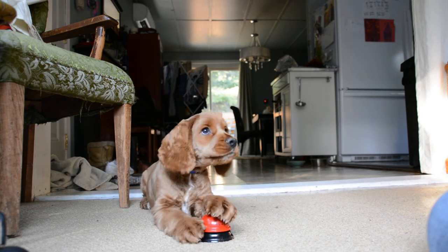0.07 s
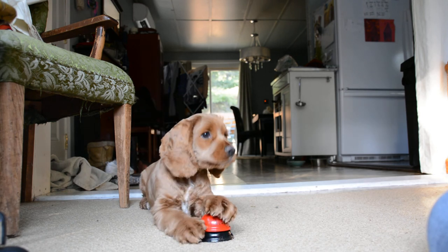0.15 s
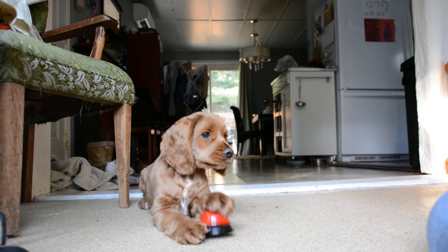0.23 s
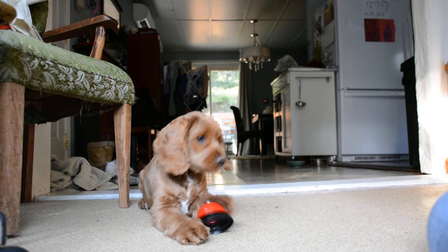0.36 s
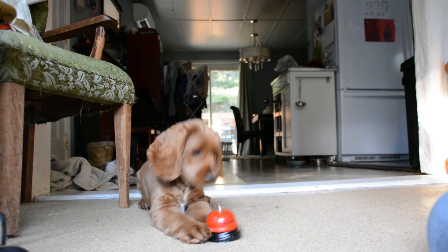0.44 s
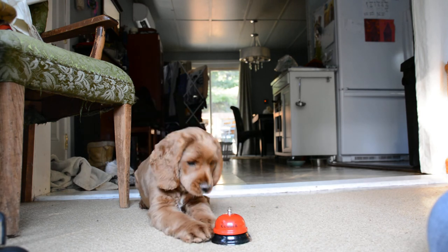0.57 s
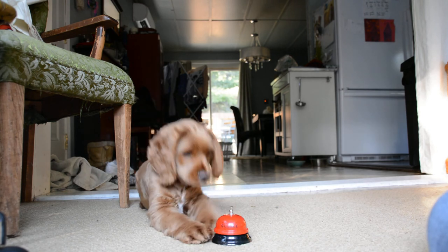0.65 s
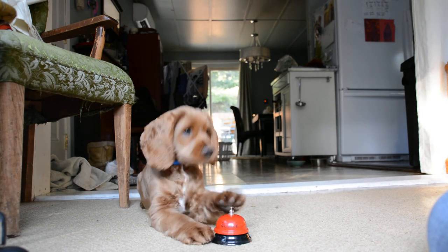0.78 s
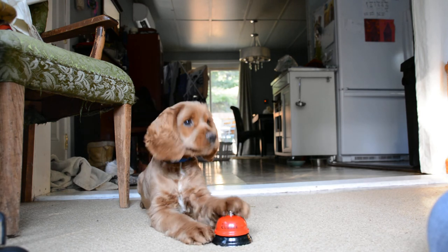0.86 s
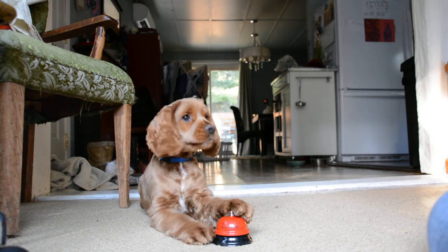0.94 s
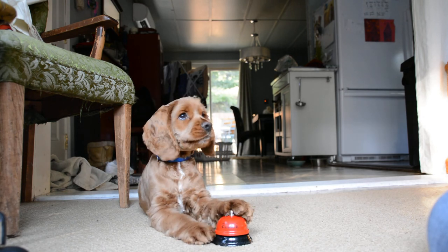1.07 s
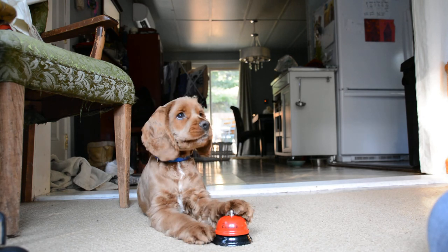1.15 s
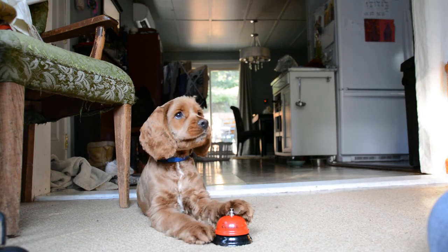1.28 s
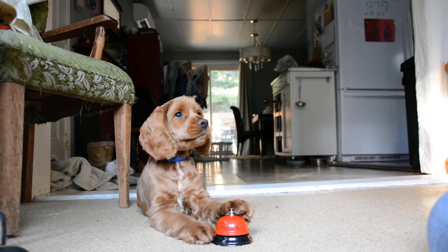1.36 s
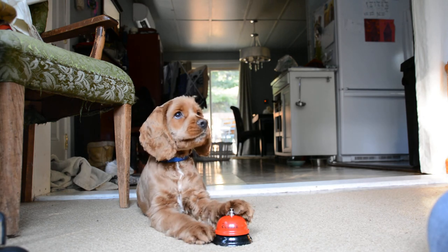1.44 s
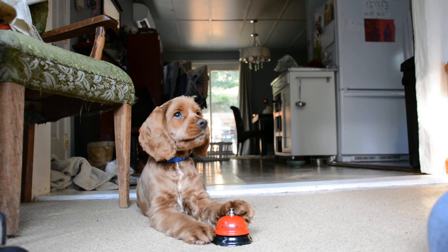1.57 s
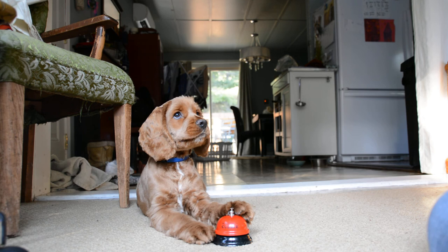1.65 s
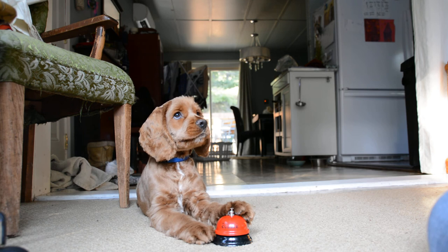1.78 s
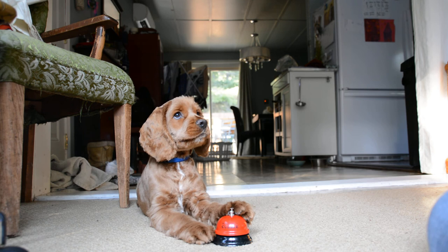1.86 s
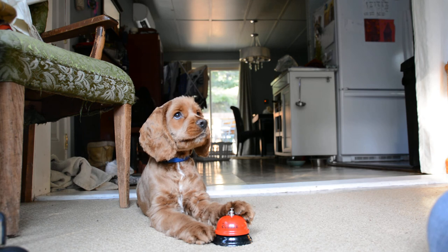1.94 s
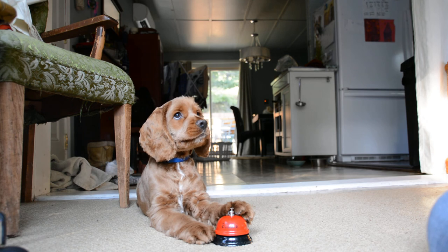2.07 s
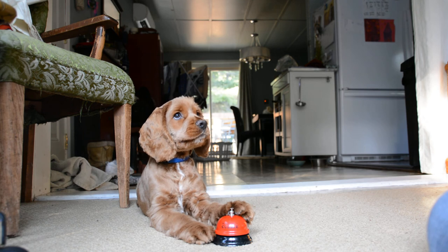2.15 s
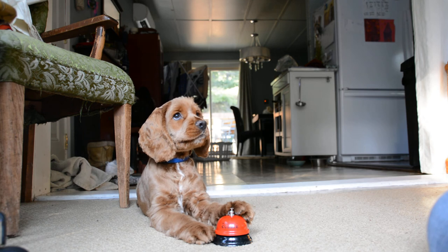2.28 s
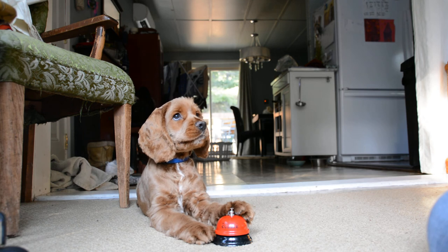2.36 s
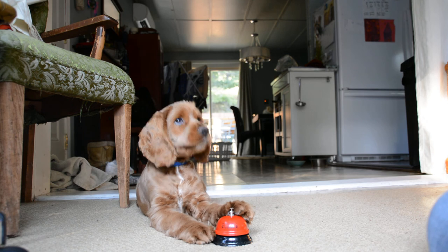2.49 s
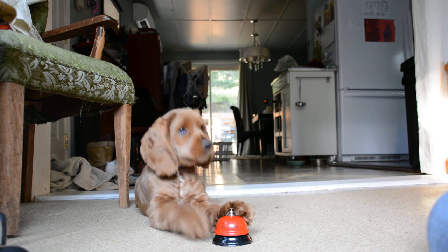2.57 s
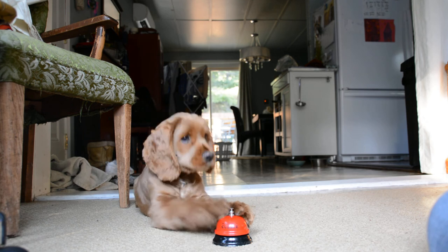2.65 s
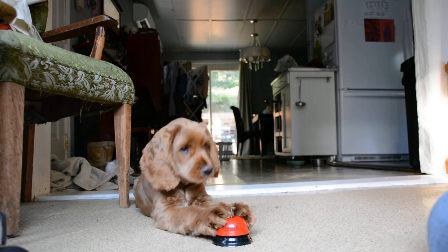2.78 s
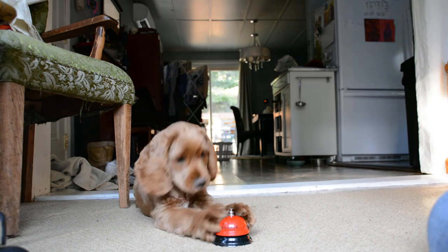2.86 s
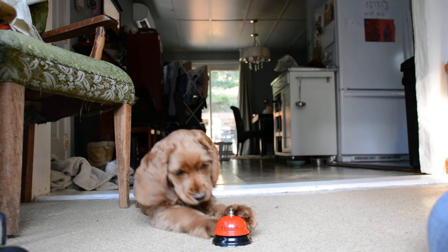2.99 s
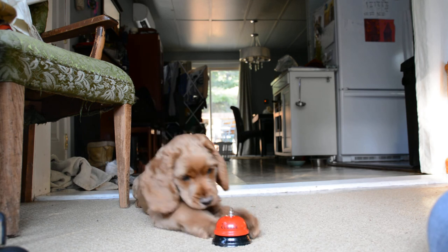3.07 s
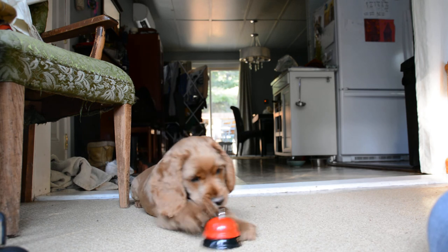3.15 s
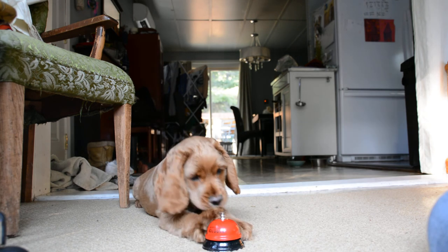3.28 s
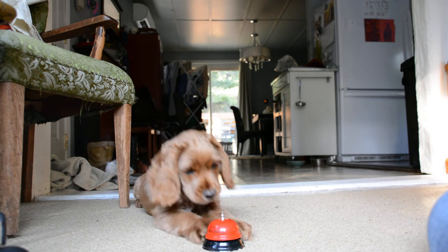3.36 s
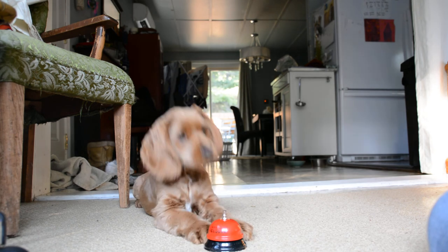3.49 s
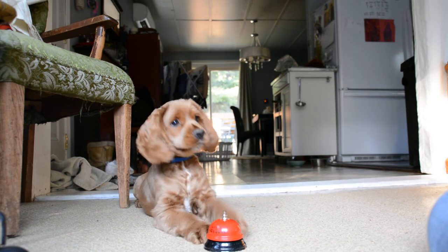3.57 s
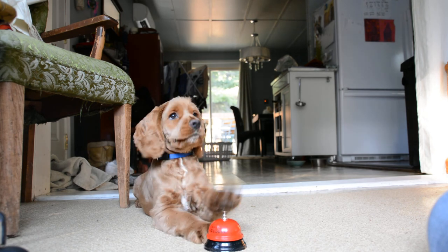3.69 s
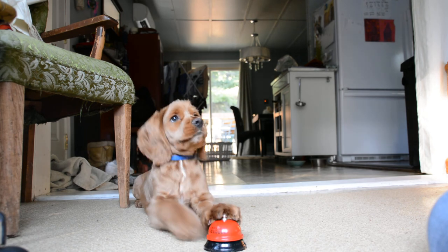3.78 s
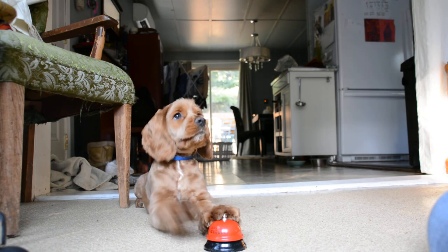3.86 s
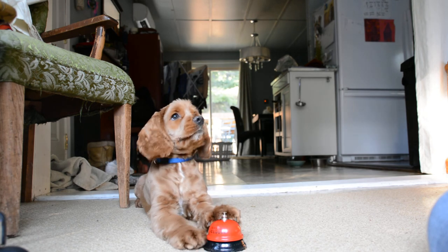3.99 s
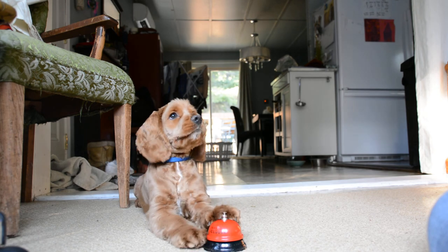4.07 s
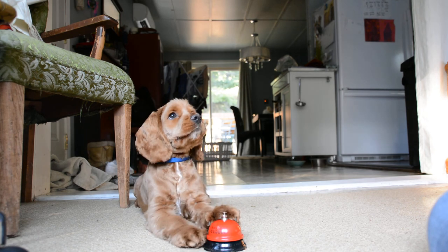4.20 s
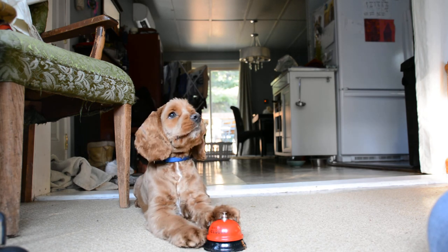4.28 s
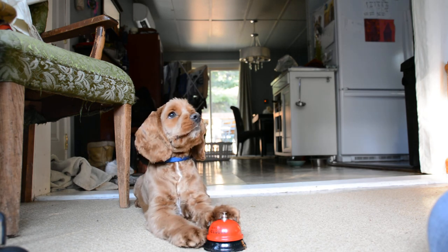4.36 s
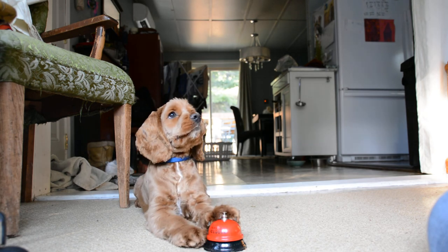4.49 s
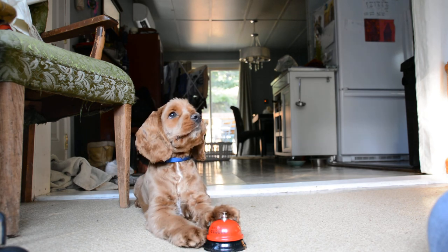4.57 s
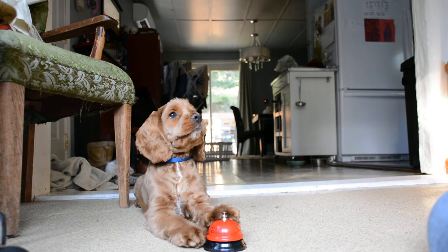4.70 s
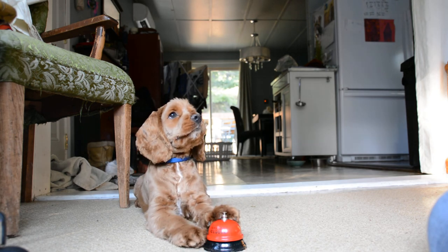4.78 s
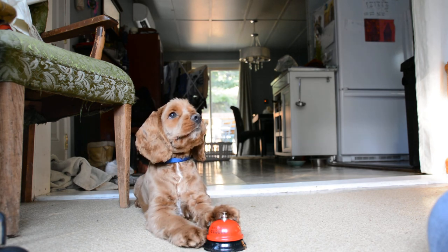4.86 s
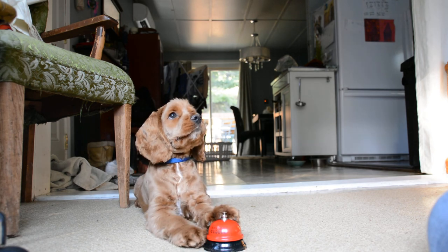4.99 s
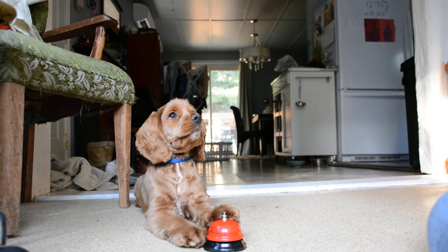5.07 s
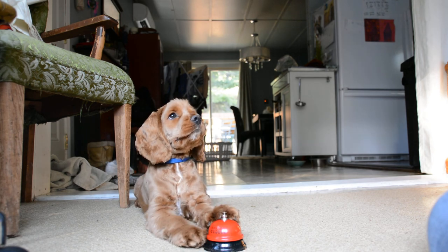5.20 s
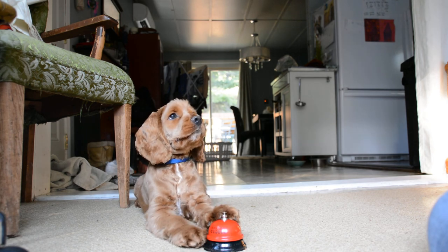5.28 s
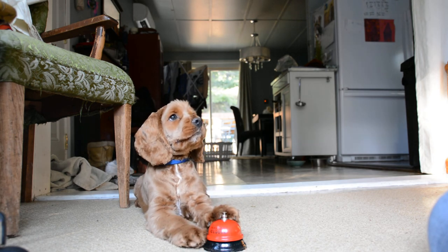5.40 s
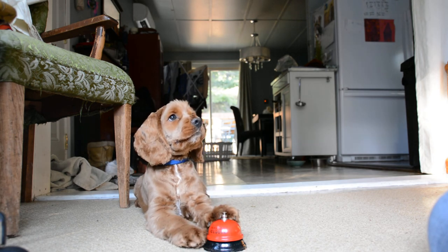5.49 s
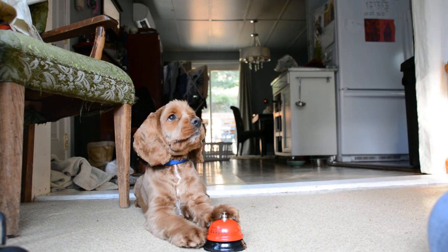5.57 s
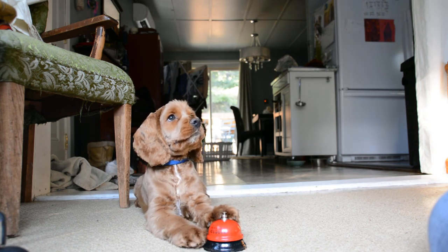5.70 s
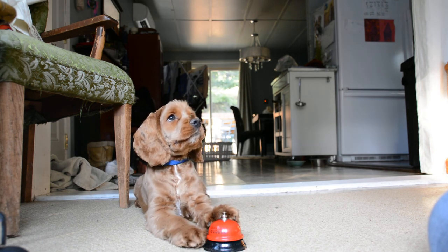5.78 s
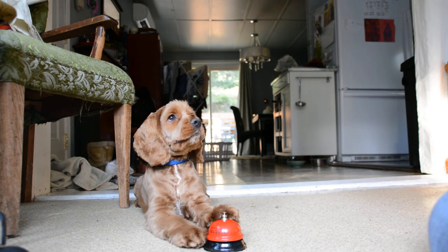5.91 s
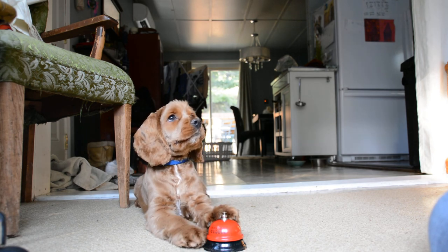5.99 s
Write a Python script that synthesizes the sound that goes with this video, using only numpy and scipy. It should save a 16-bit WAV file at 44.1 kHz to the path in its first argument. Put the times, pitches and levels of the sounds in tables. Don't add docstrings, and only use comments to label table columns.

```python
import sys
import numpy as np
from scipy import signal
from scipy.fft import rfft, irfft, next_fast_len
from scipy.io import wavfile
from scipy.ndimage import uniform_filter1d, map_coordinates

SR = 44100
rng = np.random.default_rng(int(sys.argv[2]) if len(sys.argv) > 2 else 0)


def waveform_to_disk(signal):
    frames = np.transpose(np.atleast_2d(signal))
    scaled = np.clip(frames, -1, 1) * 32767
    samples = np.round(scaled).astype(np.int16)
    wavfile.write(sys.argv[1], SR, samples)


def gain_from_decibels(decibels):
    exponent = np.asarray(decibels, float) / 20
    return 10 ** exponent


N = 266343
SPAN = 8192
HZ = np.fft.rfftfreq(SPAN, 1 / SR)
# t/s, peak/dB, low pairs/dB rel, bell turned to the left -1..1, paw still touching 0..1
DINGS = [
    (0.8488, -8, -6, 0.3, 0),
    (3.3893, -31, -3, 0.12, 0.88),
    (3.7487, -10.5, -1, 0.089, 0),
]


def dome(track):
    low_pairs = np.array([0, 1, 1, 1, 0])
    rim_pair = np.array([0, 1, 0, 0, 0])
    flank_pairs = np.array([0, 0, 1, 1, 0])
    ding_db = [-1, -17, -14, -6.5, -11.5]
    turn_db = [-0.5, -0.5, 1.5, -2.5, 0.5]
    touch_db = [1.5, 0.5, 2.5, -11.5, 2.5]
    lands = [
        [1.3, -.8, -.4, -.95, .33],
        [.7, .9, 1.2, 1.4, .5],
        [1.0, .7, 1.25, .38, -.5],
    ]
    # level/dB always, and per turn
    lean_db = [-.3, 0, 2.09, .2, .9]
    turn_lean_db = [7, 0, -0.8, -2.5, -3.5]
    # rate/(dB/s) always, and per turn
    skew_rate = [6.5, 8, -3.5, 6, 5.5]
    turn_skew = [-6, -8, 5, 3, -3]
    # rate/(dB/s) under a touching paw, per turn, and under a lingering claw
    touch_choke = [150, -2.5, -20, -25, 139.5]
    turn_choke = [-5, 5, -35, -75, 10.5]
    claw_choke = [258.5, -0.5, 58.5, 0.5, 100]
    for (s, db, low_db, turn, touch), angles in zip(DINGS, lands):
        levels = db + low_db * low_pairs + ding_db
        levels = levels + turn * np.array(turn_db) + touch * np.array(touch_db)
        leans = lean_db + turn * np.array(turn_lean_db)
        skews = skew_rate + turn * np.array(turn_skew)
        chokes = touch * np.array(touch_choke) + turn * np.array(turn_choke)
        ring(track, s, levels, angles, leans, skews, chokes)

    # t/s, peak/dB, rim pair/dB rel, flank pairs/dB rel
    taps = [(0.261, -43.5, -14.5, -6), (0.332, -45.5, -17, 2), (.3777, -43, -35, -18),
            (.4288, -34, -7.5, -6.5), (.4594, -37, -44, -5), (.5521, -36, -34, -18),
            (1.2052, -46, -18, -16), (2.9647, -53, -6, 0), (2.977, -44.5, 1, -27), (3.0144, -43, -28, -18),
            (3.0842, -49, -7, -17), (3.137, -33, -7, -17), (3.2048, -24.5, -25, -2.5),
            (3.895, -37, -30, -18)]
    tap_db = [1, 2, -5.5, 2, -13.5]
    chance = rng.uniform(-1, 1, (len(taps), 3, 5)) * [[1.5], [2.5], [30]]
    for (s, db, rim_db, flank_db), (angles, leans, skews) in zip(taps, chance):
        levels = db + rim_db * rim_pair + flank_db * flank_pairs + tap_db
        ring(track, s, levels, angles, leans, skews, claw_choke)


def ring(track, s, levels, angles, leans, skews, chokes):
    # lower f/Hz, upper f/Hz
    modes = [(9424, 9465), (1072, 1087), (3050, 3085), (5943, 5981), (12872, 12895)]
    # free t60/s, share of the paw's damping, phase by which left leads/rad
    losses = [(0.675, 0.89, .7), (5, 0.8, -0.2), (2.4, 1.32, .3), (0.69, 0.93, .37), (0.29, .75, -.99)]
    # t/s, damping from then on/(dB/s)
    grip = [(0, 51), (.38, 329.5), (.5, 200), (.83, 163), (1.19, 329), (3.2, 430.5), (3.38, 22),
            (3.757, 197.5), (3.785, 499), (3.835, 150), (3.905, 448.5)]
    settle_s = 0.029
    t = np.arange(SR // 2) / SR
    side = np.array([[.5], [-.5]])
    when, rate = np.transpose(grip)
    held = rate[np.clip(np.searchsorted(when, s + t) - 1, 0, None)]
    paw_db = np.cumsum(uniform_filter1d(held, size=round(settle_s * SR))) / SR
    sound = np.zeros((2, len(t)))
    rows = zip(modes, losses, levels, angles, leans, skews, chokes)
    for (low, high), (t60, share, lead), db, angle, lean, skew, choke in rows:
        lower = np.cos(angle) * gain_from_decibels(skew * t) * np.sin(2 * np.pi * low * t + lead * side)
        upper = np.sin(angle) * gain_from_decibels(-skew * t) * np.sin(2 * np.pi * high * t + lead * side)
        decay_db = (60 / t60 + choke) * t + share * paw_db
        sound += gain_from_decibels(db + 1.0 - decay_db + lean * side) * (lower + upper)
    onset = 1 - np.exp(-t / 4e-5)
    fade = np.cos(np.pi * t) ** .5
    add(track, s, sound * fade * onset, wet_db=-12)


def knocks(track):
    # t/s, peak/dB, weight/dB rel, edge/dB rel
    claw_knocks = [(0.2167, -37.5, -1.5, -23), (0.2643, -29, -10, -12), (0.299, -57, 12, -3),
                   (0.3326, -28, 2.5, -4), (0.356, -30, -15, -8), (0.382, -26, -16, -27),
                   (.3938, -25.5, -16, -4), (0.4259, -13.5, -4, -20), (0.5206, -26.5, -2, -7),
                   (0.5493, -24, -4, -27), (0.6096, -34, -23, -12), (1.0738, -40.5, 5.5, -27),
                   (1.108, -52, 16.5, -13.5), (2.544, -45, 10, -21.5), (2.6613, -37, -8, -12),
                   (2.8298, -47.5, -5, -5), (2.849, -43, -5, -8), (2.8825, -41, -14, -9.5),
                   (2.9638, -36, -15, -7), (2.9801, -22.5, -3.5, -11.5), (3.0979, -27.5, 3, -11),
                   (3.1339, -27.5, 3, -6), (3.1637, -20.5, -0.5, -20), (3.18, -19.5, 0.5, -21),
                   (3.2006, -24, -31, -31), (3.2066, -21.5, -28, 1), (3.2514, -31, -10, -3),
                   (3.2755, -24, 2.5, -4.5), (3.3654, -18, -33, -20), (3.4077, -34, -13, -15)]
    # t/s, peak/dB, contact t60/s
    plunger = [
        (0.8068, -27.5, 0.038),
        (0.8318, -21.5, 0.013),
        (1.1788, -37.5, .059),
        (1.198, -22.5, 0.048),
        (3.7195, -28.5, .05),
        (3.7364, -38.5, .036),
        (3.8969, -26.5, .058),
    ]
    # [(t/s, level/dB)]
    parts = [(620, 33, 0.02, [(1.2, -44.5), (3.897, -38.5)]), (2780, 40, 0.042, [(.426, -33.5),
             (.553, -31.5), (3.165, -28)]), (2895, 41, .06, [(.56, -40.5), (3.18, -32), (3.21, -29)]),
             (3632, 12, 0.0086, [(1.2, -43.5), (3.897, -40.5)]), (4047, 31.4, 0.077, [(.386, -42),
             (3.193, -28.5), (3.245, -27.5), (3.366, -39)]), (4190, 63, .04, [(.81, -50.5), (2.665, -54),
             (3.099, -43)]), (4520, 70, 0.03, [(.851, -33), (1.2, -47), (3.897, -47.5)]),
             (5330, 67, 0.0203, [(1.2, -48.5), (3.897, -51)]), (7740, 25, .08, [(.473, -44), (.555, -36)]),
             (9670, 240, 0.017, [(.261, -41.5), (.332, -34.5), (3.207, -29)]),
             (10720, 45, .05, [(.427, -47.5), (.553, -36), (2.991, -41.5)]), (14900, 60, .13, [(.521, -51),
             (3.178, -41), (3.416, -58), (3.897, -62.5)])]
    contacts = [(*row, .03) for row in claw_knocks]
    contacts += [(s, db, -5.5, -16, t60) for s, db, t60 in plunger]
    for s, db, low_db, turn, touch in DINGS:
        clack_db = db + low_db + 2.5 - 12 * touch
        contacts.append((s, clack_db, -10.5, -3, .011))
    for s, db, body_db, edge_db, t60 in contacts:
        steel = colour(contact(body_db, edge_db), ring_db=7, scatter_db=3)
        add(track, s, gain_from_decibels(db + 15) * irfft(rattle(t60) * steel), wet_db=-1.0)
    for hz, width, t60, songs in parts:
        part = resonances([(hz, width, 0)], HZ)
        for s, db in songs:
            song = rattle(t60) * part
            level = gain_from_decibels(db) * SR / width / np.pi * np.linalg.norm(part) / np.linalg.norm(song)
            add(track, s, level * irfft(song), wet_db=-6)


def scrape(track):
    # peak t/s, peak/dB, rise/s, fall/s, weight/dB rel
    strokes = [
        (.4, -50.5, 0.66, .02, -10),
        (0.427, -27, 0.021, 0.12, -7),
        (.554, -27, 0.0081, .12, -6),
        (1.075, -61, .02, 0.15, 8),
        (2.89, -62, 0.11, 0.12, 3),
        (2.987, -31.5, 0.0075, 0.099, -12),
        (3.21, -23.5, 0.16, .17, -12.5),
        (3.373, -32.5, 0.016, 0.18, -2),
        (3.899, -34.5, 0.0032, .1, -12),
    ]
    stroke_db = 34
    step = 768
    slips = rng.standard_normal(N) * gain_from_decibels(13 * np.clip(rng.standard_normal(N), -3, 2.7))
    bunching = unit(uniform_filter1d(rng.standard_normal(N), size=round(.004 * SR)))
    slips = slips * gain_from_decibels(3.5 * bunching)
    window = np.sqrt(np.hanning(2 * step))
    for s, peak_db, rise, fall, body_db in strokes:
        start = s - min(rise, .19)
        tilt = contact(body_db, edge_db=-10)
        drag = np.zeros(round((s + fall - start) * SR) + SPAN + 2 * step)
        for i in range(0, len(drag) - SPAN - step, step):
            t = start + (i - step + np.arange(2 * step)) / SR - s
            db = peak_db - stroke_db * np.where(t < 0, -t / rise, t / fall)
            grains = unit(slips[round(start * SR) + i:][:2 * step])
            slip = rfft(gain_from_decibels(db - 1.5) * grains * window, SPAN)
            drag[i:i + SPAN] += irfft(slip * colour(tilt, ring_db=9.5, scatter_db=3))
        add(track, start - step / SR, drag, wet_db=-6.0)


def colour(tilt, ring_db, scatter_db):
    # f/Hz, width/Hz, level/dB
    base = [(1520, 580, -18), (2603, 110, 5), (2775, 69, 1.5), (2960, 130, 4), (3384, 36, -5),
            (3740, 15, 2.5), (4120, 25, -1), (4754, 64, -1.5), (5660, 21, -10), (6590, 130, -0.5),
            (7300, 26, -9.5), (8500, 84, -20.5), (8700, 68, -14.5), (9440, 150, 4), (9900, 29, -12),
            (10700, 81, -2), (12900, 44, -18.5), (14650, 284, -28)]
    peaks = [(c, w, 0.49 * db) for c, w, db in base]
    scatter = scatter_db * rng.standard_normal(len(base))
    return tilt * (1 + gain_from_decibels(ring_db) * resonances(peaks, HZ, scatter))


def contact(body_db, edge_db):
    # f/Hz, level/dB
    middle = [(400, -66.5), (1200, -9.5), (2000, -5.5), (4500, 0), (5200, -12.5), (7000, -37.5),
              (12000, -46)]
    # f/Hz, level/dB
    body = [(60, -60), (200, -20), (500, -1.5), (1000, 5.5), (1800, -2), (2800, -30.5), (6000, -62)]
    # f/Hz, level/dB
    edge = [(2000, -65), (4500, -21.5), (6000, 6), (9000, 2.5), (11000, 4.5), (13000, -11), (15300, -22.5),
            (16300, -72.5)]
    weight = gain_from_decibels(body_db + along(body, HZ))
    sharpness = gain_from_decibels(edge_db + along(edge, HZ))
    return causal(gain_from_decibels(along(middle, HZ)) + weight + sharpness)


def rattle(t60):
    t = np.arange(SPAN) / SR
    level_db = 7.9 * rng.standard_normal(SPAN) - 60 * t / max(t60, .002)
    burst = rng.standard_normal(SPAN) * gain_from_decibels(level_db)
    return rfft(burst / np.linalg.norm(burst))


def thumps(track):
    # t/s, floor/dB, hollow/dB
    drops = [(0.262, -60, -53), (0.371, -59, -58), (0.421, -52, -52), (0.547, -41.5, -39.5),
             (0.81, -43, -61), (.842, -52, -43.5), (2.669, -52, -60.5), (2.849, -63, -56),
             (2.976, -46, -43.5), (3.099, -42.5, -52), (3.138, -48, -47.5), (3.2, -47, -46.5),
             (3.269, -66, -56), (3.361, -45.5, -45.5), (3.408, -54, -46), (3.736, -51, -46),
             (3.897, -32, -40)]
    # f/Hz, width/Hz, level/dB
    floorboard = [(85, 37, 5), (126.4, 32, 1)]
    # f/Hz, width/Hz, level/dB
    cavity = [(158, 74, -2.5), (309, 37, 3), (494, 100, -3.5), (742.7, 150, -2)]
    push_s = 0.0013
    t = np.arange(SPAN) / SR
    force = t * np.exp(-t / push_s)
    push = rfft(force / force.sum())
    muffling = (1 + 1j * HZ / 900) ** 2
    for s, db, hollow_db in drops:
        floor = gain_from_decibels(db + 49.5) * push * resonances(floorboard, HZ)
        hollow = gain_from_decibels(hollow_db + 48) * rattle(0.03) * resonances(cavity, HZ) / muffling
        add(track, s, irfft(floor + hollow), wet_db=-5)


def resonances(peaks, f, scatter_db=0):
    total = 0
    offsets = scatter_db + np.zeros(len(peaks))
    for k, ((c, w, db), d) in enumerate(zip(peaks, offsets)):
        total = total + (-1) ** k * gain_from_decibels(db + d) * 1j * f * w / (c * c - f * f + 1j * f * w)
    return total


def causal(gain):
    cepstrum = irfft(np.log(gain + 1e-6))
    cepstrum[1:SPAN // 2] *= 2
    cepstrum[SPAN // 2 + 1:] = 0
    return np.exp(rfft(cepstrum))


def add(track, s, x, wet_db):
    # f/Hz, t60/s
    decay = [(100, 0.45), (1000, 0.21), (4000, 0.22), (10000, 0.24), (15000, 0.1058)]
    # f/Hz, likeness
    tail_alike = [(100, 1), (1000, 1), (5000, 1), (15000, 0.42)]
    hz, t, z = signal.stft(rng.standard_normal((2, 10240)), SR, nperseg=256)
    hz = hz[:, None]
    z = pair(z, tail_alike, hz) * gain_from_decibels(-60 * t / along(decay, hz))
    tail = signal.istft(z, SR, nperseg=256)[1]
    tail = np.pad(tail / np.linalg.norm(tail[0]), ((0, 0), (130, 0)))
    tail[:, 0] = gain_from_decibels(-wet_db)
    y = gain_from_decibels(wet_db) * signal.fftconvolve(x * np.ones((2, 1)), tail, axes=1)
    track[:, round(s * SR):][:, :y.shape[1]] += y


def quiet():
    # f/Hz, density/dB per Hz
    air_db = [(15, -49), (25, -20.5), (64, -21), (87, -12), (229, -8), (270, -9.5), (301, -8), (427, -9),
              (591, -4.5), (641, -7), (695, -4.5), (754, -5.5), (2350, -11.5), (10400, -28), (16000, -39)]
    # f/Hz, likeness
    air_alike = [(60, 1), (130, 0.96), (290, 0.45), (640, 0.42), (1410, 0.16), (3100, 0.15), (6820, 0.15),
                 (15000, 0.1178)]
    # f/Hz, level/dB rms
    fridge = [(48.4, -86), (96.9, -83.5), (602.9, -70), (2105, -81), (2406, -82)]
    m = next_fast_len(N)
    hz = np.fft.rfftfreq(m, 1 / SR)
    noise = rfft(rng.standard_normal((2, m))) * gain_from_decibels(along(air_db, hz))
    air = irfft(pair(noise, air_alike, hz), m)[:, :N]
    knots = rng.standard_normal((len(fridge), 2, 200))
    t = np.arange(N) / SR
    hum = np.zeros(N)
    for (f, db), (level_knots, phase_knots) in zip(fridge, knots):
        level_drift = map_coordinates(level_knots, [18 * t])
        phase_drift = map_coordinates(phase_knots, [18 * t])
        hum += gain_from_decibels(db + 3.5 + level_drift) * np.sin(2 * np.pi * f * t + 0.692 * phase_drift)
    return gain_from_decibels(-56.5) * unit(air) + hum


def pair(z, alike, hz):
    turn = np.arccos(np.clip(along(alike, hz), -1, 1)) / 2
    mid = np.cos(turn) * z[0]
    side = np.sin(turn) * z[1]
    return np.array([mid + side, mid - side])


def along(points, hz):
    f, v = np.transpose(points)
    return np.interp(np.log(hz + 1), np.log(f + 1), v)


def unit(x):
    return x / np.sqrt(np.mean(np.abs(x) ** 2) + 1e-20)


def scene():
    track = np.zeros((2, N + 2 * SR))
    for source in (dome, knocks, thumps, scrape):
        source(track)
    bass_cut = signal.butter(3, 75, "high", fs=SR, output="sos")
    return signal.sosfilt(bass_cut, track[:, :N]) + quiet()


def roll_off(x):
    return signal.sosfilt(signal.butter(12, 16800, fs=SR, output="sos"), x)


def record(dry):
    rounded = dry / (1 + np.abs(dry / .85) ** 6) ** (1 / 6)
    band_limit = signal.ellip(8, .1, 70, 16300, fs=SR, output="sos")
    limited = signal.sosfilt(band_limit, rounded)
    return roll_off(limited)


dry = scene()
out = record(dry)
waveform_to_disk(out)
```